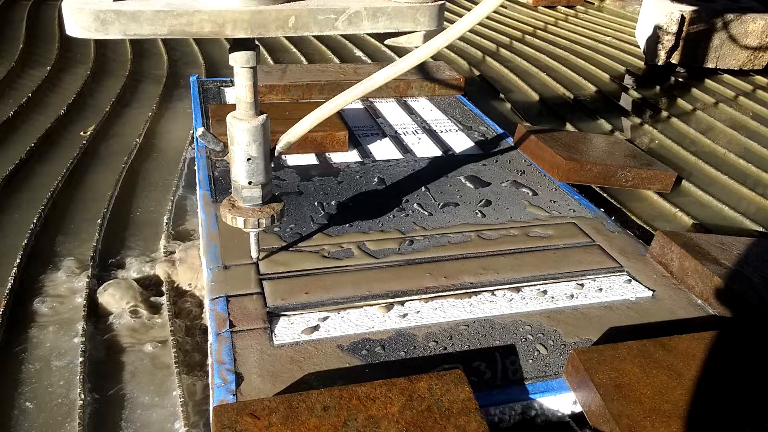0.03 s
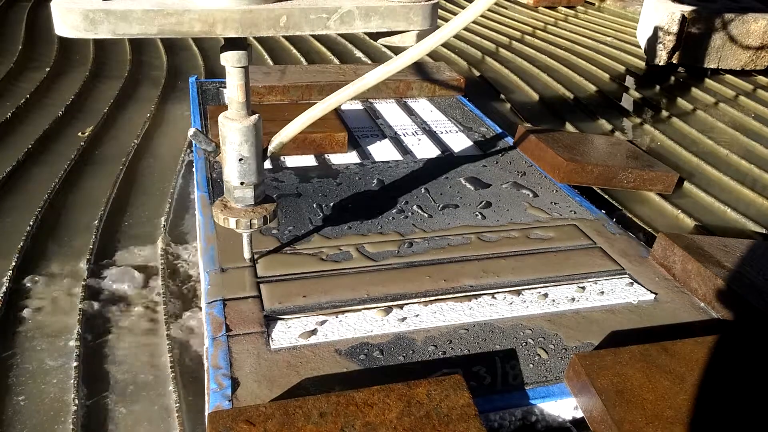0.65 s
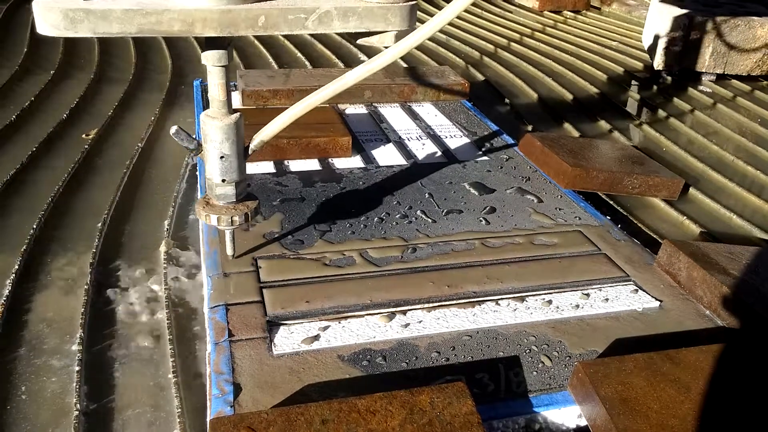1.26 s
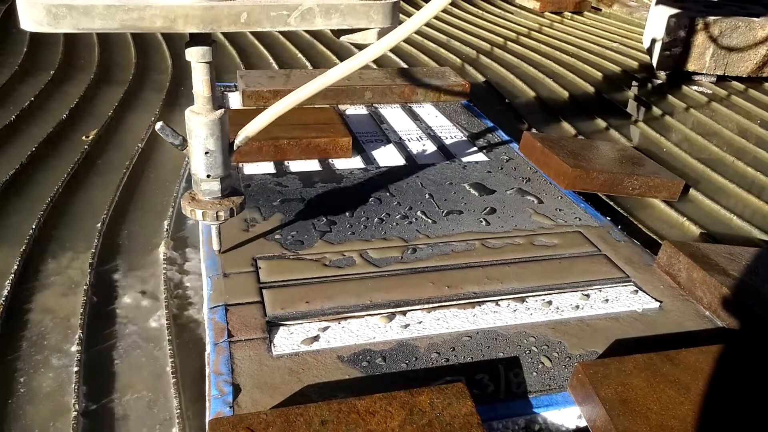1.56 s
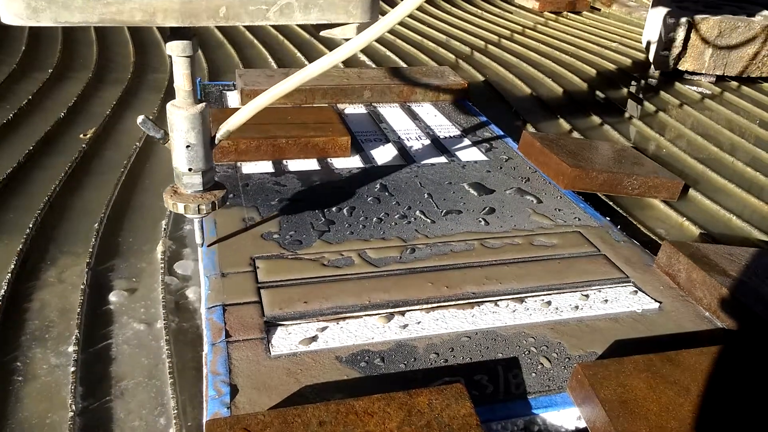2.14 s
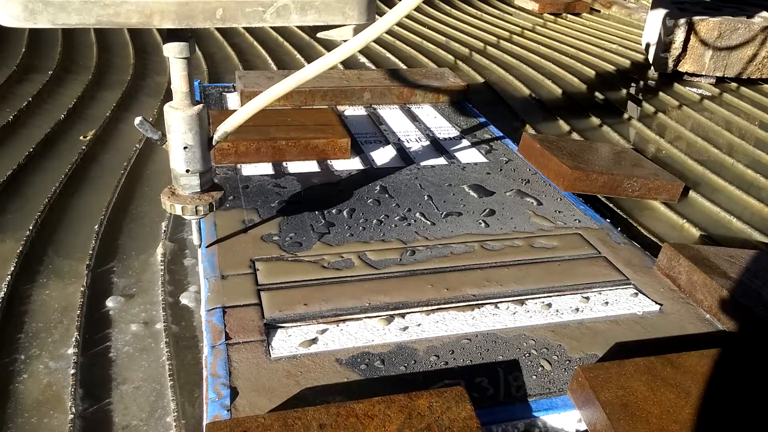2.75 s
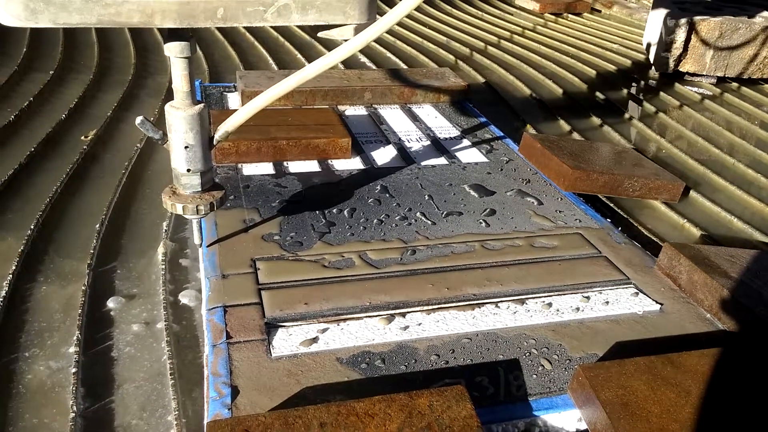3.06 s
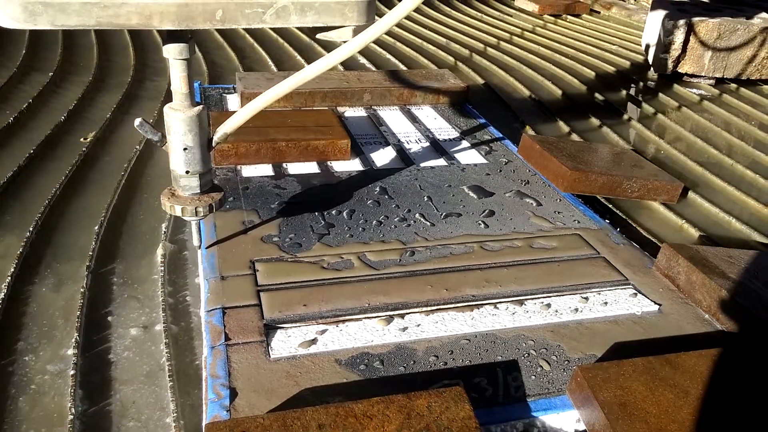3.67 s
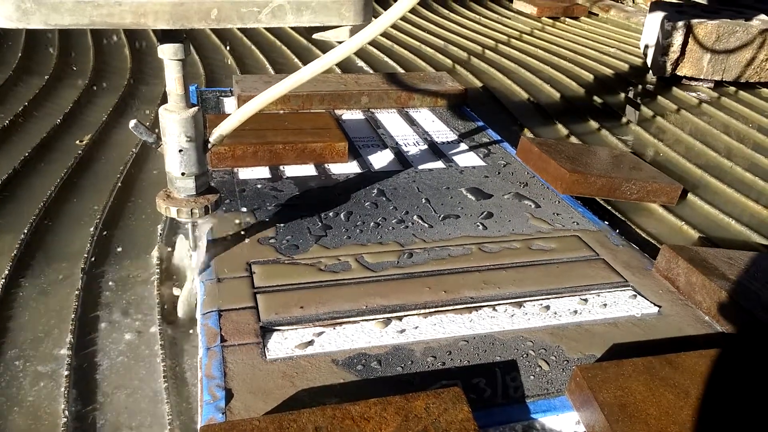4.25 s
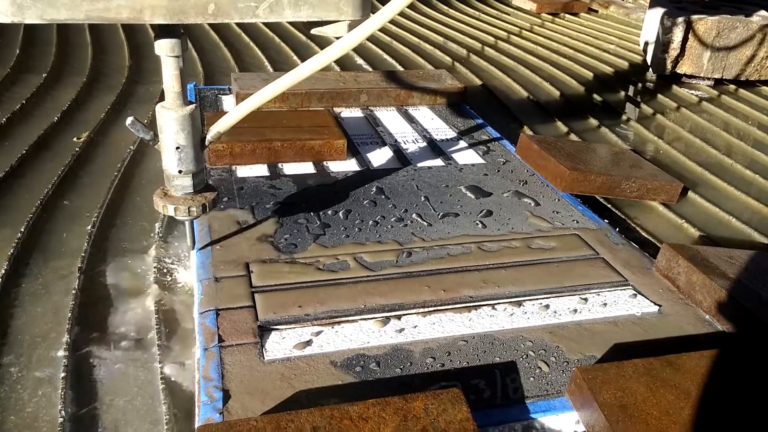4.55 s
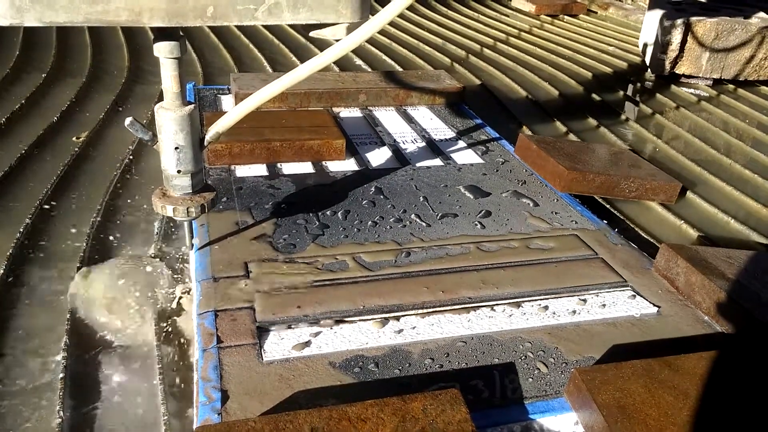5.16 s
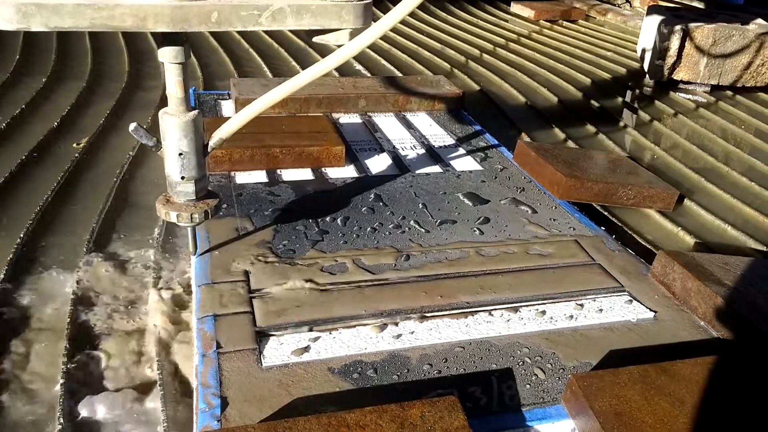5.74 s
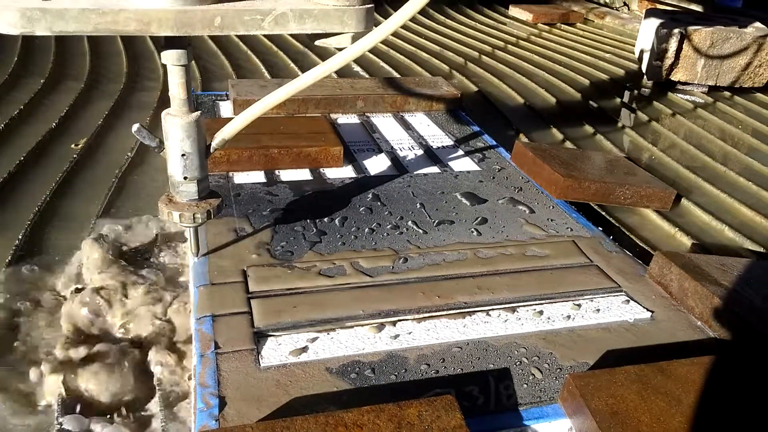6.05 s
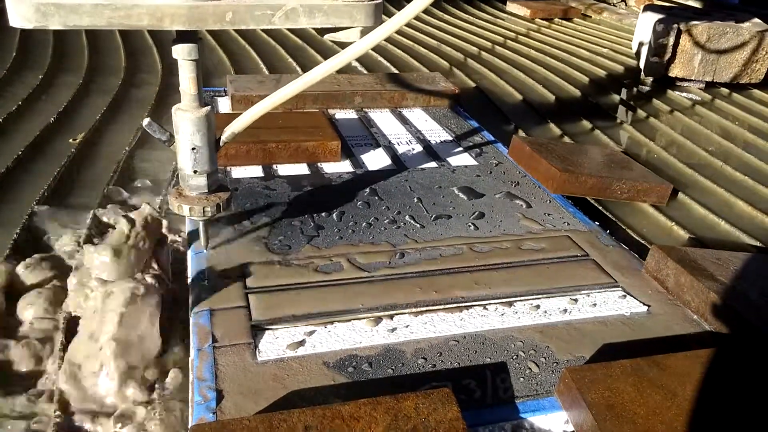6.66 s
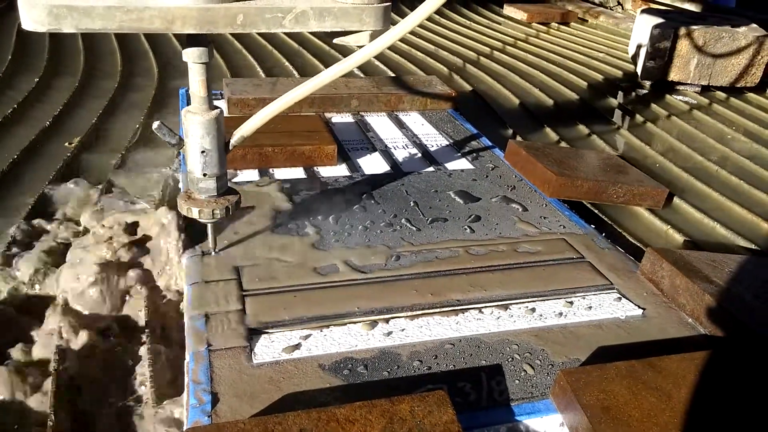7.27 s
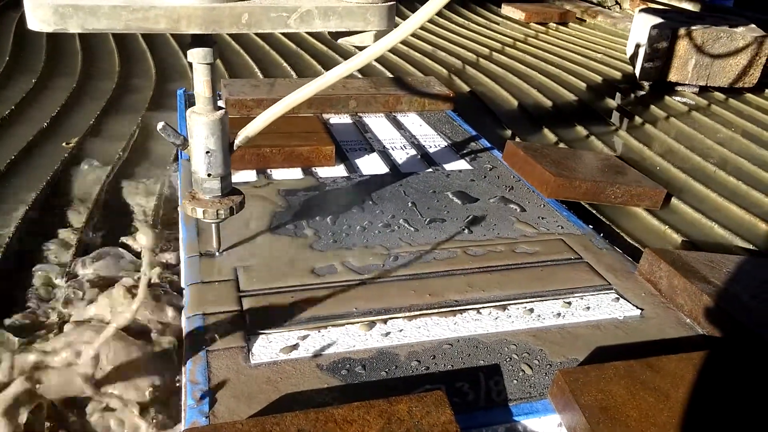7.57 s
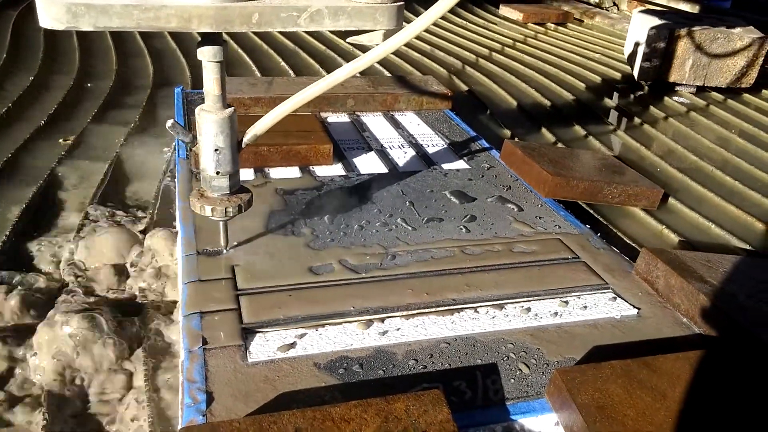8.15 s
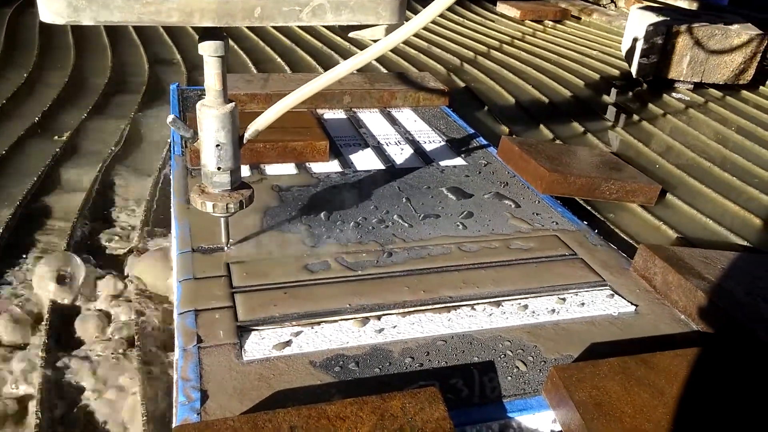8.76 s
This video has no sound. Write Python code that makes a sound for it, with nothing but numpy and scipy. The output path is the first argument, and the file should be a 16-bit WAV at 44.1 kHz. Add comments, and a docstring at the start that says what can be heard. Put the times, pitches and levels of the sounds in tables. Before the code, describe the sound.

A pitched pump drone with a rasping edge fills a workshop, broken early by a burst of air and a brief metallic ring. The drone drops to a low hum with a faint thin hiss. Then a nearby waterjet suddenly starts cutting a panel, with a bright, steady hiss and an uneven roar that dips and surges over bubbling water and splattering drops.

```python
"""A piston pump drones under load: a waterjet cutter in a workshop. A puff of air rings a steel part,
then the pump eases off. The valve ticks open: the jet hisses at the nozzle, roars along the edge of a
panel and churns the tank, throwing spatter over the slats. Far behind sit a thin hiss, the whine of
the axis drives, stray bubbles and faint pings of metal."""
import sys
import numpy as np
from scipy import signal
from scipy.fft import rfft, irfft, next_fast_len
from scipy.io import wavfile
from scipy.ndimage import uniform_filter1d, map_coordinates

SR = 44100
rng = np.random.default_rng(int(sys.argv[2]) if len(sys.argv) > 2 else 0)


def put_to_file(sound):
    """Save the sound as 16-bit audio at rate SR, in the file named by the first command-line argument."""
    columns = np.atleast_2d(sound).T  # one column per channel
    safe = np.clip(columns, -1, 1)
    whole_steps = np.round(safe * 32767)
    wavfile.write(sys.argv[1], SR, whole_steps.astype(np.int16))


N = 397341
START_S, JET_ON_S, TOP_HZ = 0.627, 4.3005, 15800

# Fader rides of the cut: t/s, then relative level/dB of roar, hiss and churn
CUT_FADERS = [(4.3, -16.5, -15, -35), (4.53, -15.5, -15, -38), (4.8, -15.5, -17.5, -23),
              (5.22, -17, -22.5, -22.5), (5.35, -17.5, -19.5, -30), (5.9, -17.5, -22, -32.5),
              (6.2, -19, -23.5, -29), (6.4, -22, -23.5, -22.5), (6.6, -18.5, -21.5, -37),
              (6.9, -18, -21.3, -32), (7.2, -26, -23, -24.5), (7.65, -21, -22.5, -25),
              (7.87, -25.5, -22.5, -24), (8.15, -22, -21.5, -24.5), (8.5, -26, -24, -26),
              (9.0, -25, -23.5, -25)]
# Lulls, the jet meeting less resistance or smothered: t/s, length/s, then drop/dB of roar, hiss and churn
JET_LULLS = [(4.809, 0.38, 8.5, -0.5, 3.5), (4.973, 0.13, 4.5, 3.5, 15), (5.137, 0.029, 9, 4.5, 8),
             (5.957, 0.031, 8, 1.5, -4), (6.327, 0.049, 6.5, 0, 6), (6.944, .1, 15, 9, 19),
             (7.22, 0.22, 5.5, 3.5, 16), (7.516, 0.026, 10, 0, 1), (7.606, 0.02, 6, 0.5, -2),
             (7.756, .055, 2.5, 0.5, 6), (8.414, 0.029, 9, -2, 8), (8.595, 0.067, 4, 1, 7),
             (8.815, 0.032, 7, 2, 11)]
# Surges, the jet biting harder: centre t/s, length/s, roar boost/dB
JET_SURGES = [(4.512, .04, 2), (5.166, 0.0087, 8), (7.137, 0.057, 4), (7.943, 0.019, 4), (8.195, 0.08, 3.5),
              (8.362, .02, 4.5), (8.559, 0.022, 4), (8.763, 0.041, 6), (9.002, .04, 3.5)]
# Colour of the roar on plate and water: f/Hz, level/dB
ROAR_EQ = [(60, -7), (200, -1), (400, 0), (900, 0.5), (1700, -1), (2500, -2), (3200, -5), (3700, -5),
           (4200, -4), (4650, -6.5), (5600, -7), (7500, -8), (11000, -22), (16000, -11.5)]
# Colour of the nozzle hiss: f/Hz, level/dB
HISS_EQ = [(300, -9), (1500, -15.5), (3500, -4.5), (4700, -3), (5600, -0.5), (7200, -1.5), (8200, 0.5),
           (9300, 0.5), (10000, -1), (11600, -3), (12300, -9), (13200, -14), (16000, -14.5)]
# Stereo spread of the jet: f/Hz, left minus right/dB
JET_PAN = [(100, 0.5), (2400, .3), (4400, -.7), (7500, -1.6), (8800, -2.5), (10000, -0.5), (11200, 1.5),
           (13000, 5), (15500, -1)]


def jet():
    """The nozzle hisses steadily, the roar lurches as the jet meets plate or water, and the tank boils."""
    roar_db, hiss_db, churn_db = curves(CUT_FADERS)
    lulls = sum(np.outer(drops, gate(s, length, edge_s=0.021)) for s, length, *drops in JET_LULLS)
    roar_lull, hiss_lull, churn_lull = lulls
    surge_db = sum(db * gate(s - length / 2, length, edge_s=.016) for s, length, db in JET_SURGES)
    # as the tank starts to boil, waves break into the jet and make it sway and sputter
    boil = np.interp(clock(), [4.8, 6.9, 7.3], [.3, .4, 1])
    slosh_db = boil * 0.8 * wobble(26)
    sputter_db = boil * (0.58 * wobble(60) + 1.86 * wobble(220))
    roar_gain = amp(roar_db + 5 - roar_lull + surge_db + slosh_db + sputter_db)
    roar = roar_gain * rush(ROAR_EQ, alike=0.018, patchy_db=0.94)
    nozzle_db = hiss_db - hiss_lull + 0.17 * (surge_db + slosh_db)
    hiss = amp(nozzle_db + 5 + 0.14 * sputter_db) * rush(HISS_EQ, patchy_db=2)
    spray = mist(hiss_lull) + boil * spatter(nozzle_db - 3)
    churn = tank(churn_db - churn_lull + slosh_db)
    wide = filtered(roar + hiss + spray + churn, lambda hz: pan(along(JET_PAN, hz)))
    return wide * np.clip((clock() - JET_ON_S) / .003, 0, 1)


# Airy top of the mist: f/Hz, level/dB
MIST_EQ = [(5000, -17), (9000, -10.5), (12000, -6), (13200, -1.5), (14200, -1), (15600, 0)]


def mist(lull_db):
    """Fine mist sizzles with the nozzle's whistles, strong as the jet opens, then settling."""
    fresh = np.exp(-np.maximum(clock() - 5.03, 0) / 0.17)
    level_db = -20 + 9 * fresh - 0.62 * lull_db + .7 * wobble(22)
    return amp(level_db) * (rush(MIST_EQ, patchy_db=1.7) + amp(-8.5) * whistles())


# Nozzle resonances: f/Hz, width/Hz, relative level/dB, left minus right/dB
NOZZLE_BANDS = [(8400, 660, -6, -8), (10600, 560, -6.5, 5), (11650, 500, -8.5, 12)]


def whistles():
    """Noise rings in the narrow resonances of the nozzle, each fluttering by itself."""
    def band(hz, width):
        noise = rng.standard_normal((2, N))
        return unit(filtered(noise, lambda f: 1 / (1 + (2 * (f - hz) / width) ** 2)))
    return sum(amp(db + 2.1 * wobble(12)) * pan(left_db) * band(hz, width)
               for hz, width, db, left_db in NOZZLE_BANDS)


def spatter(level_db):
    """Thrown drops slap on the slats as short dry clicks."""
    return amp(level_db) * grains(per_s=420, hz=2000, spread=.7, cycles=.5, scatter_db=5, samples=160)


# Low body of the heaving water: f/Hz, level/dB
HEAVE_EQ = [(20, -22), (40, -2.5), (65, -1), (120, -2.5), (200, -3), (320, -7.5), (600, -11.5), (1500, -31)]
# Big air pockets bursting: t/s, level/dB
TANK_GULPS = [(4.82, -15), (4.86, -21), (4.90, -18), (4.948, -16), (5.117, -20.5), (5.245, -21),
              (6.31, -22), (6.43, -21), (7.185, -24), (7.93, -25), (7.995, -16.5), (8.76, -24)]


def tank(churn_db):
    """Air driven under water heaves up in lumps, bubbles and a few deep gulps."""
    bubbles = grains(per_s=220, hz=148, spread=0.36, cycles=0.96, scatter_db=4.5, samples=3072)
    heave = amp(churn_db + 2 * wobble(25)) * rush(HEAVE_EQ, alike=0.046)
    bursts = sum(amp(db) * np.exp(-((clock() - s) / 0.014) ** 2) for s, db in TANK_GULPS)
    gulp_eq = [(20, -14), (55, 5), (120, -9), (220, -4), (500, -27), (1500, -50)]
    return heave + amp(churn_db - 1.5) * bubbles + bursts * rush(gulp_eq, alike=0.15)


SHAFT_HZ, PISTONS = 29.934, 9
EASE_AT_S, EASE_LAG_S = 2.512, 0.087
# Colour of the flow rasp: f/Hz, level/dB
RASP_EQ = [(400, -20), (1000, -2), (1500, 0), (2400, -3.5), (3600, -3), (6000, -6), (9000, -13),
           (11000, -27), (13000, -40), (16000, -55)]


def pump():
    """The pump drones and its flow rasps with each stroke; it drops its load, then ducks under the jet."""
    pressure = np.exp(-np.maximum(clock() - EASE_AT_S, 0) / EASE_LAG_S)

    def fader(loaded_db, eased_db):
        return pressure * amp(loaded_db) + (1 - pressure) * amp(eased_db)
    tone_gain = fader(-14.5, -33)
    load = pressure * amp(-14.5) / tone_gain  # share of the loaded colour in the tones
    shaft_angle = 2 * np.pi * SHAFT_HZ * clock() + 0.0027 * wobble(3.24)
    drone = tone_gain * pistons(shaft_angle, load)
    rumble = fader(-24, -35.5) * (housing(shaft_angle) + fan())
    pulse = 1 + 0.091 * np.sin(PISTONS * shaft_angle)
    rasp = fader(-31, -50) * pulse * rush(RASP_EQ, alike=.05, patchy_db=.9) * pan(-8)
    duck_db = -8.5 * np.clip((clock() - JET_ON_S) / 0.11, 0, 1)
    return amp(duck_db) * (drone + rumble + rasp)


# Piston tones: multiple of the stroke rate, then relative level/dB under load and eased off
PISTON_TONES = [(1, -22.5, -9), (2, -0.5, -1), (3, -19.5, -20.5), (4, -21, -15.5), (5, -23.5, -20),
                (6, -27, -24.5), (7, -26.5, -28), (8, -24.5, -22.5), (9, -27, -23), (10, -24.5, -22),
                (11, -30, -31), (12, -26, -26), (13, -29.5, -25), (14, -23, -23.5), (15, -46, -46),
                (16, -35, -36), (17, -31, -33), (18, -30, -25)]
# Their stereo spread: f/Hz, left minus right/dB
PISTON_PAN = [(270, 5), (540, -3.5), (810, -11), (1080, 12.5), (1350, 16), (2400, 5.5), (3800, -11.5),
              (4850, -12)]


def pistons(shaft_angle, load):
    """Nine pistons a turn give a stack of tones; their unevenness adds lines a shaft rate apart."""
    # the strokes come slightly early or late, strong or weak, once a turn
    lead = .27 * np.cos(shaft_angle + .3)
    uneven = 1 + .13 * np.cos(shaft_angle) + .04 * np.sin(2 * shaft_angle)
    tones = np.zeros((2, N))
    for k, loaded_db, eased_db in PISTON_TONES:
        hz = k * PISTONS * SHAFT_HZ
        # short waves arrive left and right out of step
        apart = np.clip(hz / 1800, 0, 1) ** 2 * np.array([[.8], [-.8]])
        waver_db = (k > 3) * (1.7 * wobble(16) - .8)
        level_db = load * loaded_db + (1 - load) * eased_db + waver_db
        phase = k * PISTONS * shaft_angle + lead + rng.uniform(0, 2 * np.pi) + apart
        tones += amp(level_db) * pan(along(PISTON_PAN, hz)) * np.sin(phase)
    return tones * uneven


# Colour of the once-a-turn rattle: f/Hz, level/dB
RATTLE_EQ = [(50, -14), (110, -1), (300, -0.5), (470, -7), (700, 3), (850, -12), (980, -6), (1170, -16),
             (1320, -2.5), (1800, -25.5), (4000, -35)]
# Colour of the housing rumble: f/Hz, level/dB
RUMBLE_EQ = [(25, -34), (45, -13), (70, -4), (130, -8), (175, 1.5), (230, -1), (330, -5.5), (480, -7.5),
             (680, -10.5), (850, -17.5), (980, -8), (1170, -24), (1400, -23), (2200, -58)]


def housing(shaft_angle):
    """The housing rumbles, and rattles in the same way on every turn."""
    orders = np.arange(2049)
    hz = orders * SHAFT_HZ
    lines = amp(along(RATTLE_EQ, hz) + 1.4 * rng.standard_normal(len(hz))) * (orders > 1) * (hz < 5000)
    one_turn = unit(irfft(lines * np.exp(2j * np.pi * rng.random(len(hz)))))
    angles = np.linspace(0, 2 * np.pi, len(one_turn), endpoint=False)
    rattle = np.interp(shaft_angle, angles, one_turn, period=2 * np.pi)
    return amp(-1) * rush(RUMBLE_EQ, alike=0.99, patchy_db=0.5) + amp(-5) * rattle


# Fan hum: f/Hz, relative level/dB
FAN_TONES = [(111, -10), (166.7, -8)]


def fan():
    """A cooling fan hums on two wavering tones."""
    return sum(amp(db + 2.2 * wobble(8.9)) * np.sin(2 * np.pi * hz * clock() + .5 * wobble(5))
               for hz, db in FAN_TONES)


# Modes of the steel part: f/Hz, level/dB, peak t/s, t60/s
STEEL_MODES = [(1915, -20, .90, .7), (1950, -20.5, .905, .65), (3643, -16.5, .925, .55),
               (4354, -20, .92, .68), (4705, -24, .92, .55), (4960, -32, .92, .5), (5300, -30, .88, .5),
               (5469, -22, .90, .6), (6390, -34, .92, .8), (7865, -30, .92, .5), (8344, -33, .88, .4),
               (8662, -34, .89, .4), (10100, -26, .88, .5), (12310, -42, .88, .4)]
# Low thump of the puff: f/Hz, level/dB
THUD_EQ = [(25, -20), (60, -4), (110, 2), (170, -0.5), (300, -7.5), (900, -53)]
# Breath of the puff: f/Hz, level/dB
PUFF_EQ = [(100, -8), (300, 7), (700, 7.5), (1500, -1.5), (4500, 3), (6500, 0), (9000, 0), (10300, -7),
           (11500, -20), (13700, -27), (16000, -35)]


def air_puff():
    """A puff of air thuds and sets a steel part chattering; each mode swells at its own pace and dies."""
    puff_at_s, ring_at_s = 0.831, 0.842
    attack_s, hold_s, t60_s = 0.018, 0.038, 0.58
    steel = sum(amp(db) * ring(ring_at_s, hz, peak_s - ring_at_s, t60)
                for hz, db, peak_s, t60 in STEEL_MODES)
    thud = amp(-18.5) * np.exp(-((clock() - .89) / 0.12) ** 2) * rush(THUD_EQ, alike=0.98)
    age = clock() - puff_at_s
    decay_db = 60 * np.maximum(age - attack_s - hold_s, 0) / t60_s
    air = np.clip(age / attack_s, 0, 1) * amp(-14.5 - decay_db) * rush(PUFF_EQ, patchy_db=2.5)
    return (steel + air) * pan(-3) + thud


def valve_tick():
    """The valve ticks just before the water arrives."""
    age = clock() - 4.284
    burst = amp(-26) * (age > 0) * np.exp(-np.abs(age) / .005)
    return burst * rush([(1500, -20), (5000, -4), (8500, 0), (12000, -3), (16000, -11)])


# Faint metal accents in the shop: t/s, f/Hz, level/dB, t60/s
SHOP_PINGS = [(0.62, 3670, -32, .9), (1.74, 2094, -34, 1.0), (2.03, 4134, -32, 0.6)]


def pings():
    """Small metal parts ring now and then, off to the right."""
    return sum(amp(db) * ring(s, hz, 0.028, t60) for s, hz, db, t60 in SHOP_PINGS) * pan(-12.5)


# Colour of the thin hiss bed: f/Hz, level/dB
STANDBY_EQ = [(600, 1), (950, 1), (1200, -26), (1900, -18), (2650, -0.5), (3100, -10.5), (5200, -9),
              (6500, -1), (8000, 2), (9200, 4), (10500, -4.5), (12500, -12.5), (16000, -28)]


def standby():
    """A thin steady hiss lies under the whine of the axis drives."""
    whine = amp(-45.5 + wobble(5.5)) * np.sin(2 * np.pi * 8000 * clock())
    return amp(-38.5) * rush(STANDBY_EQ, alike=0.031) * pan(-5.5) + whine * pan(-8)


def stray_bubbles():
    """Stray air rises in the tank with a soft gurgle."""
    return amp(-42.5) * grains(per_s=30, hz=190, spread=0.643, cycles=2, scatter_db=4.5, samples=3072)


def ring(start_s, hz, swell_s, t60):
    """One metal mode swells and fades; chatter and echoes make it beat differently left and right."""
    t = np.arange(SR * 3 // 4) / SR
    knots = np.arange(61) / 80
    jitter = rng.standard_normal((2, len(knots))) + 1j * rng.standard_normal((2, len(knots)))
    beats = np.array([np.interp(t, knots, side) for side in jitter])
    carrier = np.exp(2j * np.pi * (hz * t + rng.random() + np.array([[0], [1 / 4]])))
    envelope = np.minimum(t / max(swell_s, .005), amp(-60 * (t - swell_s) / t60))
    out = np.zeros((2, N))
    out[:, round(start_s * SR):][:, :len(t)] = unit(((1 + .5 * beats) * carrier).real) * envelope
    return out


def rush(eq, alike=0, patchy_db=1):
    """Stereo noise of rms 1 with patches of random gain; eq is (f/Hz, level/dB), alike=1 is mono."""
    spectra = signal.stft(rng.standard_normal((2, N)), nperseg=512)[2]
    patches = uniform_filter1d(rng.standard_normal(spectra.shape[1:]), size=6, axis=0)
    patches = uniform_filter1d(patches, size=12, axis=1)
    pair = signal.istft(spectra * amp(patchy_db * unit(patches)), nperseg=512)[1][:, :N]
    mid, side = filtered(pair, lambda hz: amp(along(eq, hz)))
    width = np.arccos(np.clip(alike, -1, 1)) / 2
    return unit(np.cos(width) * mid + np.sin(width) * np.array([side, -side]))


def grains(per_s, hz, spread, cycles, scatter_db, samples):
    """Short damped rings at random moments, pitches and stereo phases; rms 1."""
    count = int(per_s * N / SR)
    when, loud, left, right = rng.random((count, 4)).T[..., None]
    pitch = np.clip(hz * np.exp(spread * rng.standard_normal((count, 1))), 30, TOP_HZ)
    turns = pitch * np.arange(samples) / SR
    strength = amp(-scatter_db * np.log(np.maximum(loud, .02)))
    fade = strength * np.exp(-turns / cycles) * (1 - np.exp(-2 * turns))
    index = ((when * N).astype(int) + np.arange(samples)).ravel()
    sides = (fade * np.sin(2 * np.pi * (turns + phase)) for phase in (left, right))
    return unit(np.array([np.bincount(index, side.ravel(), N)[:N] for side in sides]))


def wobble(per_s):
    """A smooth random curve with per_s knots a second."""
    coarse = clock()[::16]
    knots = rng.standard_normal(int(N * per_s / SR) + 4)
    return np.interp(clock(), coarse, map_coordinates(knots, [coarse * per_s], mode="nearest"))


def gate(start_s, length_s, edge_s):
    """1 for a stretch of time and 0 outside it, with ramped edges."""
    return np.clip(np.minimum(clock() - start_s, start_s + length_s - clock()) / edge_s + .5, 0, 1)


def curves(rows):
    """One value per sample for each column after the time."""
    times, *columns = np.transpose(rows)
    return [np.interp(clock(), times, column) for column in columns]


def along(points, hz):
    """Read (f/Hz, value) points on a log frequency axis."""
    freqs, values = np.transpose(points)
    return np.interp(np.log(hz + 1), np.log(freqs + 1), values)


def filtered(x, response):
    """Shape x with a gain that depends on frequency."""
    size = next_fast_len(N + SR // 2)
    return irfft(rfft(x, size) * response(np.fft.rfftfreq(size, 1 / SR)), size)[..., :N]


def pan(left_db):
    """Left and right gains for a level difference."""
    return amp(np.array([[.5], [-.5]]) * left_db)


def amp(db):
    """Decibels to gain."""
    return 10 ** (np.asarray(db) / 20)


def unit(x):
    """Scale to rms 1."""
    return x / np.sqrt(np.mean(x ** 2) + 1e-20)


def clock():
    """The time of each sample in seconds."""
    return np.arange(N) / SR


def scene():
    """The machine runs on under its jet."""
    return pump() + standby() + stray_bubbles() + air_puff() + pings() + valve_tick() + jet()


def record(dry):
    """The sound cuts in abruptly, its peaks are rounded off and the very top is rolled away."""
    live = dry * np.clip((clock() - START_S) / .002, 0, 1)
    rounded = live / (1 + np.abs(live / 1.1) ** 8) ** (1 / 8)
    return filtered(rounded, lambda hz: np.sin(np.pi / 2 * np.clip((TOP_HZ - hz) / 250 + .5, 0, 1)) ** 2)


dry = scene()
out = record(dry)
put_to_file(out)
```